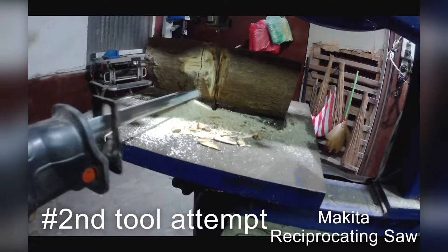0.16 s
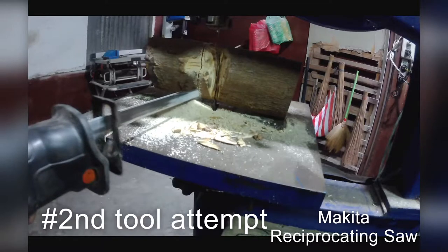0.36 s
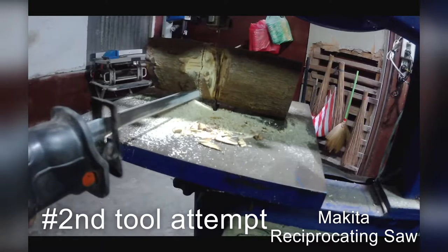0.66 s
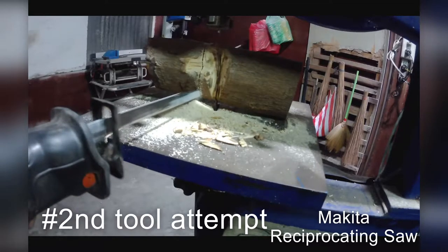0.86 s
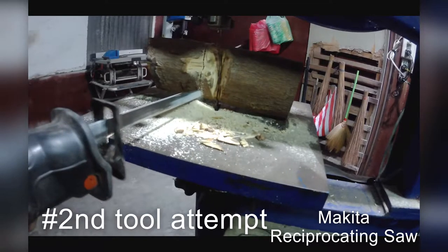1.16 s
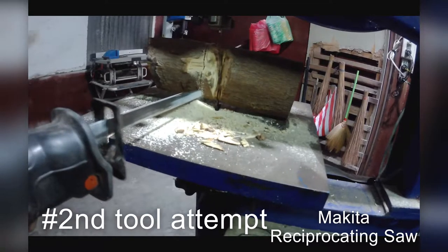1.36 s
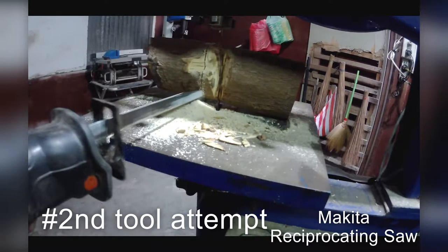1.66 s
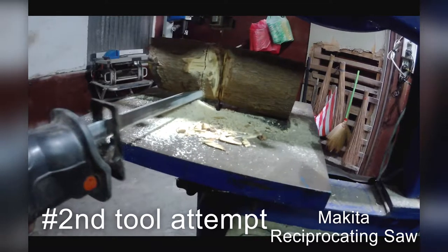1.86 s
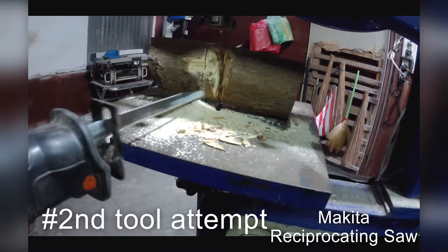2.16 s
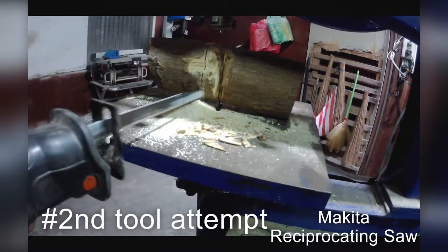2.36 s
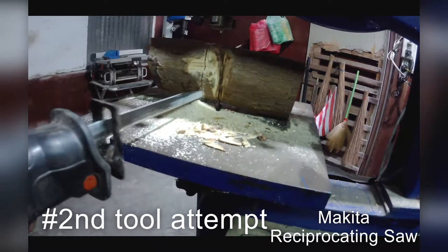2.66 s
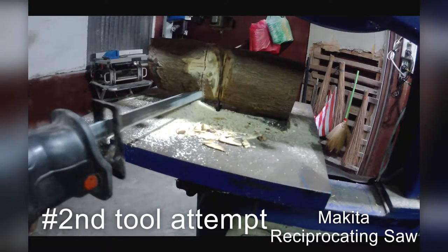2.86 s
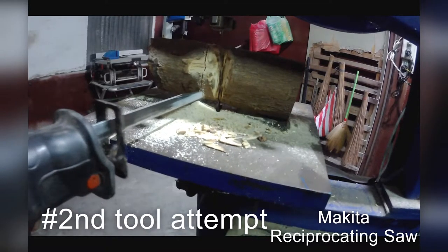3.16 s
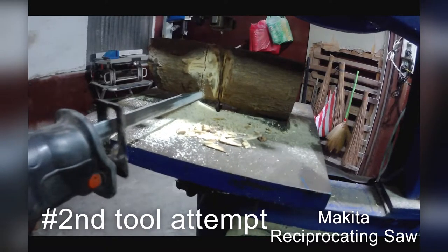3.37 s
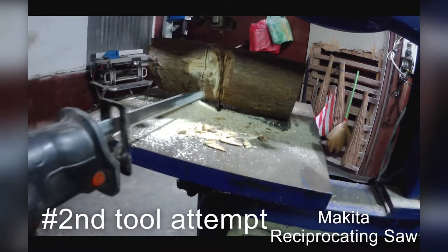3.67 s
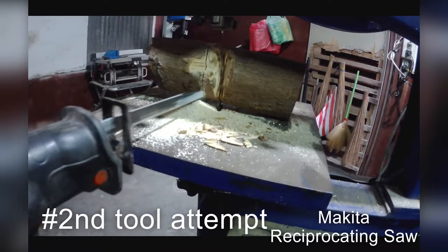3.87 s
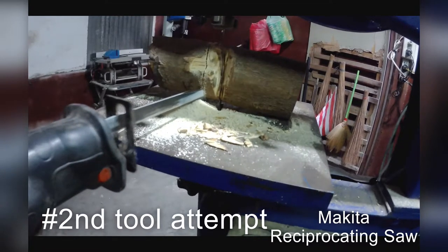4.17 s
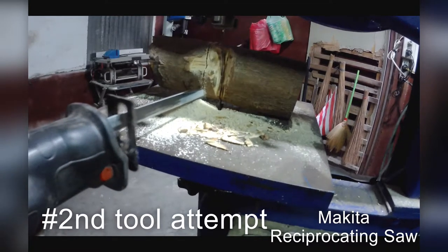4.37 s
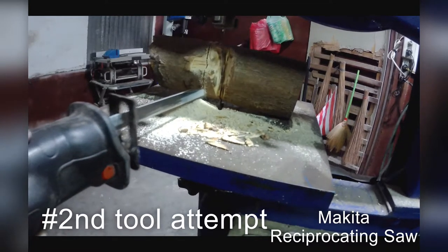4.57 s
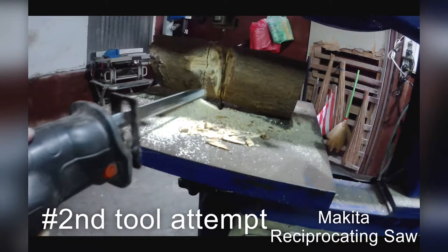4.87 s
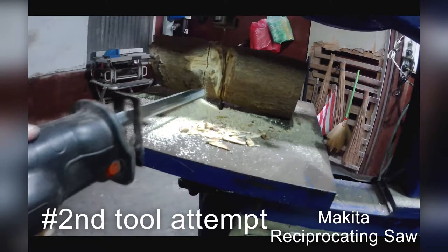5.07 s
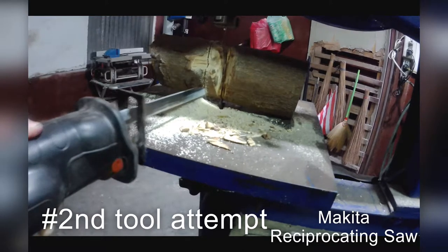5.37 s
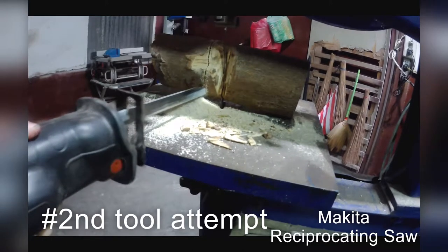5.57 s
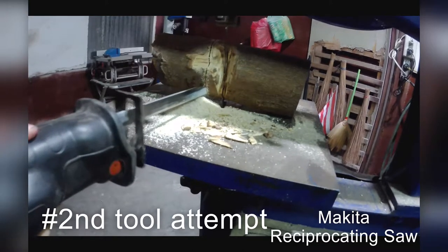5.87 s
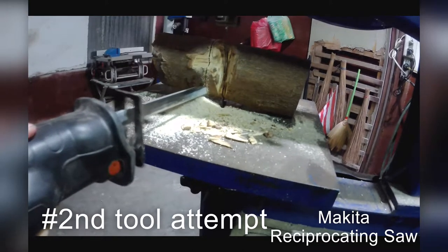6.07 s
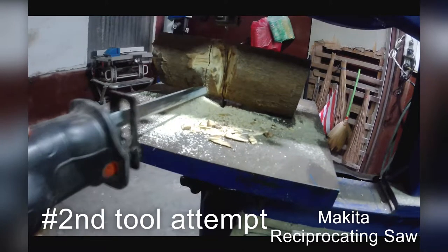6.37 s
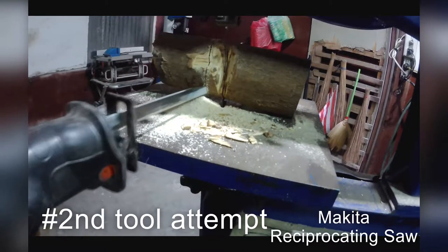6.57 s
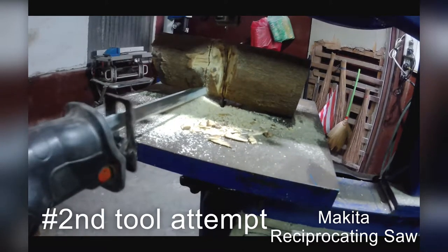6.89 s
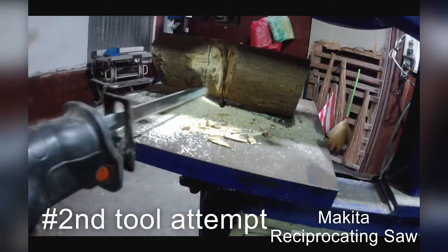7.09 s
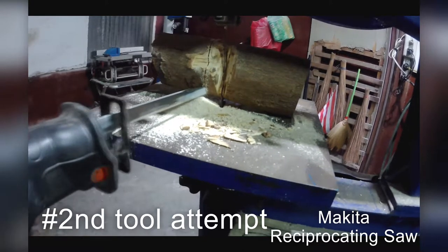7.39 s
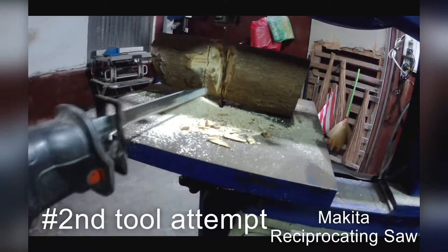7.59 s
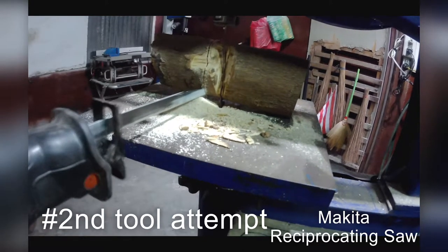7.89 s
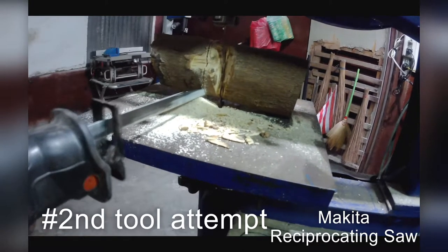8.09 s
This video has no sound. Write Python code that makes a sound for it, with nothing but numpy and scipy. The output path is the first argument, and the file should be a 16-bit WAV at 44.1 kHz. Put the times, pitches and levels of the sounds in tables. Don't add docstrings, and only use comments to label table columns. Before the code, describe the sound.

Slowed saw cutting wood: rapid hollow knocking about eleven strokes per second, grainy rasp, motor hiss, brittle high mirrored sheen, small ticks and momentary gaps.

```python
import sys
import numpy as np
from scipy import signal
from scipy.fft import rfft, irfft
from scipy.io import wavfile
from scipy.ndimage import uniform_filter1d

SR = 44100
rng = np.random.default_rng(int(sys.argv[2]) if len(sys.argv) > 2 else 0)


def materialize(psi):
    bounded = np.clip(np.atleast_2d(psi).T, -1, 1)
    quanta = np.round(bounded * 32767).astype(np.int16)
    wavfile.write(sys.argv[1], SR, quanta)


def invert_db(x):
    u = np.asarray(x, float) / 20
    return 10 ** u


N = 363384
TIME = np.arange(N) / SR
TOP_HZ, MIRROR_TOP_HZ = 4010, 15300


def rms_one(x):
    return x / np.sqrt(np.mean(x ** 2) + 1e-20)


def in_time(rows):
    s, *columns = np.transpose(rows)
    return [np.interp(TIME, s, c) for c in columns]


def at_hz(points, hz):
    table_hz, table_db = np.array(points)[:, 0], np.array(points)[:, 1]
    return np.interp(np.log(hz + 1), np.log(table_hz), table_db)


def around(s, reach_s=.06):
    span = slice(max(int((s - reach_s) * SR), 0), int((s + reach_s) * SR))
    return span, TIME[span] - s


def drift(rate):
    pole = np.exp(-80 * np.pi * rate / SR)
    noise = rng.standard_normal(N // 40 + 2002)
    slow = signal.lfilter([1], [1, -2 * pole, pole * pole], noise)[2000:]
    return np.interp(np.arange(N) / 40, np.arange(len(slow)), rms_one(slow))


def ring(clicks, hz, t60):
    decay, turn = invert_db(-60 / (t60 * SR)), 2 * np.pi * hz / SR
    return signal.lfilter([0, np.sin(turn)], [1, -2 * decay * np.cos(turn), decay * decay], clicks + 1e-18)


def colour(x, spectrum):
    hz = np.arange(N // 2 + 1) * SR / N
    above = np.clip((hz - spectrum[-1][0]) / 150, 0, 9)
    below = np.clip((spectrum[0][0] - hz) / 150, 0, 9)
    return rms_one(irfft(rfft(x) * invert_db(at_hz(spectrum, hz) - 9 * (above + below) ** 2), N))


def grains(per_s, spread_db):
    size_db = spread_db * np.minimum(rng.exponential(1, N), 4)
    sizes = invert_db(size_db) * rng.choice([-1, 1], N)
    return sizes * (rng.random(N) < per_s / SR)


# (frequency [Hz], width [Hz], level [dB rms])
WHINE_TONES = [(100, 3, -49), (1809, 40, -55), (2010, 14, -63), (3219, 60, -56), (3795, 7, -64),
               (3826, 6, -62)]


def whine():
    total = np.zeros(N)
    for hz, width_hz, db in WHINE_TONES:
        t60 = np.log(1000) / np.pi / width_hz
        total += invert_db(db) * rms_one(ring(rng.standard_normal(N), hz, t60))
    return total


# (frequency [Hz], density [dB per Hz])
MOTOR_HISS = [(1000, -18), (1360, -12), (1800, -2), (1980, -5.5), (2260, -3.5), (2550, -11.5), (2700, -8),
              (3250, -3), (3600, -6), (3740, -19), (3850, -15), (3960, -27), (4080, -39.5), (4250, -48.5)]


def motor(stroke):
    phase = 2 * np.pi * (stroke - .05)
    press_db = 0.52 * np.cos(phase) + 0.31 * np.cos(2 * phase)
    flutter = invert_db(press_db + .7 * drift(8.3))
    return colour(flutter * grains(9000, spread_db=2.0), MOTOR_HISS)


SHAKE_MULTIPLES = [3, 4, 5, 6, 7, 8, 9, 11, 13, 15, 16, 18, 19, 21, 31, 44]
SHAKE_LEVELS = [-67, -60, -53.5, -60, -61, -55, -57, -57, -50, -49, -47, -52, -48, -52, -49, -50]


def shake(stroke):
    total = np.zeros(N)
    for multiple, db in zip(SHAKE_MULTIPLES, SHAKE_LEVELS):
        swell = np.sqrt(2) * invert_db(db + 3.56 * drift(2))
        turns = multiple * stroke + 0.063 * drift(4.1) + rng.random()
        total += swell * np.sin(2 * np.pi * turns)
    return total


# (frequency [Hz], density [dB per Hz])
RASP_SPECTRUM = [(15, -41), (25, -32), (48, -51), (119, -19.5), (176, -12), (253, -13), (344, 1.5),
                 (452, -0.5), (510, 0), (1100, -13.5), (1500, -25.5), (1950, -50.5), (3300, -120)]


def rasp(stroke):
    stroke_db = 2.18 * np.cos(4 * np.pi * (stroke - .10))
    bite = invert_db(stroke_db + 1.27 * drift(19) + 0.44 * drift(0.72))
    return colour(bite * grains(2600, spread_db=2.0), RASP_SPECTRUM)


# (frequency [Hz], decay t60 [s])
BODY_MODES = [(175, 0.04), (225, 0.048), (300, 0.055), (350, 0.032), (500, 0.064), (580, 0.036),
              (760, 0.018), (1600, 0.015)]
# (share of stroke [-], push [dB], centre of favoured modes [Hz],
# spread [octaves], scatter [dB])
STROKE_CONTACTS = [(0.967, 1.5, 400, 0.58, 3.5), (.008, -6, 210, 1.2, -2.5), (0.172, 8, 330, 0.22, 0.5),
                   (0.283, 3.5, 515, 0.35, 3), (.455, -0.5, 600, 0.87, -2), (0.496, -4, 470, 0.43, 12),
                   (.61, 4.5, 513, 0.45, 2), (0.658, 3, 191, 0.69, -0.5), (.785, -1.5, 457, 0.28, -1.5)]
HARD_CONTACTS = [0.439, 1.146, 1.89, 2.284, 2.498, 3.074, 3.156, 3.418, 3.811, 3.897, 4.031, 4.643, 4.822,
                 4.906, 5.345, 5.612, 5.785, 5.874, 6.054, 6.228, 6.76, 7.112, 7.248]
HARD_DB, HARD_LOSS_DB_PER_OCTAVE = 8.5, 3.5


def knocks(stroke, jitter_s=.0009):
    turns = np.arange(-1, 96)
    trains = np.zeros((len(BODY_MODES), N))
    hard_s = np.array(HARD_CONTACTS)
    for share, push_db, centre_hz, octaves, scatter_db in STROKE_CONTACTS:
        at_s = np.interp(turns + share, stroke, TIME, -1, -1) + jitter_s * rng.standard_normal(len(turns))
        strength_db = scatter_db * np.clip(rng.standard_normal(len(turns)), -2, .7)
        near = np.abs(at_s[:, None] - hard_s) < .0065
        is_hard = near.any(axis=1)
        at_s = np.where(is_hard, near @ hard_s, at_s)
        hard_push_db = HARD_DB - HARD_LOSS_DB_PER_OCTAVE * octaves
        strength_db = np.where(is_hard, hard_push_db - push_db, strength_db)
        per_mode = rng.standard_normal((len(BODY_MODES), len(turns)))
        inside = (at_s > 0) & (at_s < TIME[-1])
        for k, (hz, t60) in enumerate(BODY_MODES):
            off_db = -6 * (np.log2(hz / centre_hz) / octaves) ** 2
            level = invert_db(push_db + off_db + strength_db + 2.1 * per_mode[k])
            trains[k, (at_s[inside] * SR).astype(int)] -= level[inside]
    rings = sum(ring(train, hz, t60) for train, (hz, t60) in zip(trains, BODY_MODES))
    return rms_one(signal.sosfilt(signal.butter(3, 125, "high", fs=SR, output="sos"), rings))


STROKES_PER_S = 11.36
MOTOR_DB, MOTOR_FOLLOWS = -35, 0.94
# (time [s], lead on a steady crank [strokes])
CRANK_LEAD = [(0.0, -0.028), (0.5, -0.052), (1.5, -0.021), (2.5, 0.022), (4.5, 0.207), (5.5, 0.226),
              (6.0, 0.208), (8.0, 0.095), (8.24, 0.096)]
# (time [s], level [dB])
WOOD_EFFORT = [(0, -29), (1.5, -29), (2.2, -28), (3.5, -28), (4.3, -28), (5.2, -27.5), (6, -28), (7, -28.5),
               (8.24, -28)]


def scene():
    stroke = STROKES_PER_S * TIME + in_time(CRANK_LEAD)[0]
    wood_db, = in_time(WOOD_EFFORT)
    motor_db = MOTOR_DB + MOTOR_FOLLOWS * (wood_db - wood_db.mean())
    wood = invert_db(-2.2) * knocks(stroke) + invert_db(-3.9) * rasp(stroke)
    wood = signal.sosfilt(signal.butter(2, [70, 1800], "band", fs=SR, output="sos"), wood)
    saw = invert_db(wood_db) * wood + invert_db(motor_db) * motor(stroke) + shake(stroke) + whine()
    return saw[None]


def rounded_and_thinned(x, bar_db=-8):
    rounded = .23 * np.tanh(x / .23)
    hz, _, bins = signal.stft(rounded, SR, nperseg=4096)
    hz, power = hz[:, None], np.abs(bins) ** 2
    band = uniform_filter1d(power, size=7, axis=0)
    neighbours = uniform_filter1d(power, size=90, axis=0)
    heard = (band > invert_db(bar_db) ** 2 * neighbours) | (hz < 1180) | (hz > 3770)
    return signal.istft(bins * heard * (hz < TOP_HZ), SR, nperseg=4096)[1][:N]


SLIP_S, SLIP_EVERY_S = .0955, .29867


def zero_stuffed(x):
    buffer = np.floor((TIME - SLIP_S) / SLIP_EVERY_S).astype(int)
    return 4 * x * (np.arange(N) % 4 == buffer % 3)


SLIP_CLICKS = [-45, -55, -45, -52, -40, -48, -46, -57, -66, -35, -71, -56, -39, -89, -65, -49, -38, -53,
               -63, -37, -96, -57, -42, -60, -91, -48, -37, -40]
# (time [s], peak level [dB])
STRAY_CLICKS = [(0.443, -51), (2.129, -51.5), (3.597, -56.5), (3.813, -60.5), (4.02, -76.5), (4.223, -59)]
SMEAR_DB, SMEAR_FOLLOWS, SMEAR_S = -67, .75, .013
EARLY_DB, EARLY_S = -5, .014
FAINT_DB, LOUD_DB = -59, -43
BLIP_DB = -2


def empty_band(x):
    hz = np.arange(N // 2 + 1) * SR / N
    sound = (hz < TOP_HZ) | (hz > SR / 4 - TOP_HZ) & (hz < MIRROR_TOP_HZ)
    gap = (hz > 4010) & (hz < 7000)
    gap_share = np.mean(gap)
    spray = rms_one(grains(1000, spread_db=4.0)) / np.sqrt(gap_share)
    spill = np.zeros((3, N))
    slips = [(SLIP_S + k * SLIP_EVERY_S, db) for k, db in enumerate(SLIP_CLICKS)]
    for s, db in slips + STRAY_CLICKS:
        span, lag = around(s)
        size = int(db > FAINT_DB) + int(db > LOUD_DB)
        smear = invert_db(SMEAR_DB + SMEAR_FOLLOWS * (db + 50.5)) * np.exp(-(lag / SMEAR_S) ** 2)
        spill[size, span] += spray[span] * smear
        spill[size, int(s * SR)] += invert_db(db) / gap_share
        ghost_s = s - EARLY_S * rng.uniform(.6, 1.0)
        spill[size, int(ghost_s * SR)] += invert_db(db + EARLY_DB + rng.normal(0, 3)) / gap_share
    wide = gap * np.where((hz > 5700) & (hz < 6050), invert_db(-16), 1)
    strip = np.where((hz > 4900) & (hz < 5800), invert_db(6), invert_db(-14) * wide)
    passed = [strip, wide, wide + invert_db(BLIP_DB) * (hz > MIRROR_TOP_HZ)]
    clicks = np.sum(rfft(spill, axis=1) * passed, axis=0)
    return irfft(rfft(x) * sound + clicks, N)


# (centre time [s], length [ms], depth [dB])
DROPOUTS = [(0.455, 19.7, -44), (0.62, 18, -10.5), (0.934, 35, -61), (1.408, 20, -8.5), (1.713, 11.4, -18),
            (1.944, 22, -10), (2.132, 9, -12), (2.817, 38, -28), (3.173, 12.7, -23), (3.709, 12, -21),
            (3.989, 11.6, -27), (4.125, 18, -11), (4.476, 33, -7.5), (4.684, 12.2, -23), (4.779, 24, -8.5),
            (4.964, 23.5, -8.5), (5.028, 14, -6), (5.194, 26, -7.5), (5.916, 12, -14.5), (6.063, 40, -49),
            (6.515, 33, -7), (6.68, 18, -9.5), (6.73, 13, -29), (7.073, 21, -10), (7.26, 13.6, -27),
            (7.469, 23, -8), (7.654, 13.3, -23), (7.924, 37, -58), (3.08, 15, -11.5), (5.474, 24, -9.5)]
# (time [s], first line [Hz], second line or 0 [Hz])
STEADY_LINES = [(0.456, 525, 166), (0.619, 301, 193), (0.934, 503, 0), (1.406, 161, 3225), (1.712, 592, 0),
                (1.943, 3283, 0), (2.132, 505, 339), (2.817, 355, 226), (3.08, 371, 2357),
                (3.175, 336, 183), (3.987, 468, 602), (4.126, 325, 204), (4.963, 3285, 0), (5.029, 3393, 0),
                (5.194, 325, 210), (5.474, 400, 1622), (6.065, 322, 1845), (6.516, 349, 0),
                (6.68, 318, 3213), (7.262, 308, 525)]
# (frequency [Hz], peak level [dB])
LINE_LEVEL = [(160, -30.5), (330, -24), (520, -24), (1700, -35.5), (3250, -35)]
# (frequency [Hz], level [dB])
MIRROR_BAR = [(7000, -50), (7900, -47), (8300, -38), (10150, -38), (10400, -45), (11650, -45), (11900, -38),
              (13600, -38), (14000, -52)]
LONG_DROPOUT_MS, GEAR_LINE_HZ = 36, 3190


def dropouts(x):
    hz, _, bins = signal.stft(x, SR, nperseg=1024)
    hz = hz[:, None]
    strong = (np.abs(bins) > invert_db(at_hz(MIRROR_BAR, hz))) & (hz > 4500)
    murk = invert_db(-26) * (hz > 7000)
    left = signal.istft(bins * np.maximum(strong, murk), SR, nperseg=1024)[1][:N]
    full = np.ones(N)
    for s, ms, depth_db in DROPOUTS:
        span, lag = around(s)
        edge = np.clip((np.abs(lag) - ms / 2000) / .012 + .55, 0, 1)
        full[span] *= np.maximum(np.sin(edge * np.pi / 2) ** 2, invert_db(1.6 * depth_db))
    lines = [(s, line_hz) for s, *pair in STEADY_LINES for line_hz in pair if line_hz > 0]
    lines += [(s, GEAR_LINE_HZ) for s, ms, _ in DROPOUTS if ms > LONG_DROPOUT_MS]
    for s, line_hz in lines:
        span, lag = around(s)
        swell = np.cos(np.clip(lag / 0.026, -1, 1) * np.pi / 2) ** 2
        with_mirror = 1 + 2 * (line_hz > 700) * np.cos(2 * np.pi * SR / 4 * lag)
        tone = np.sin(2 * np.pi * (line_hz * lag + rng.random()))
        left[span] += invert_db(at_hz(LINE_LEVEL, line_hz)) * swell * with_mirror * tone
    return full * x + np.sqrt(1 - full ** 2) * left


def band_limit(x):
    return signal.sosfilt(signal.butter(12, 15620, fs=SR, output="sos"), x)


def record(dry):
    slowed = empty_band(zero_stuffed(rounded_and_thinned(dry[0])))
    finished = dropouts(slowed)[None]
    return band_limit(finished)


dry = scene()
out = record(dry)
materialize(out)
```